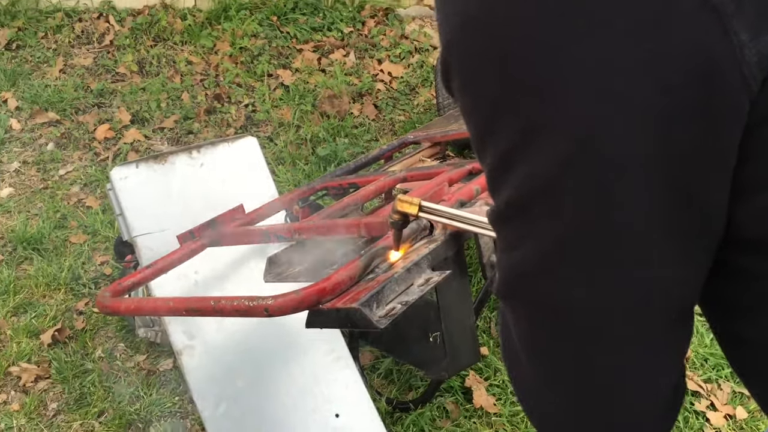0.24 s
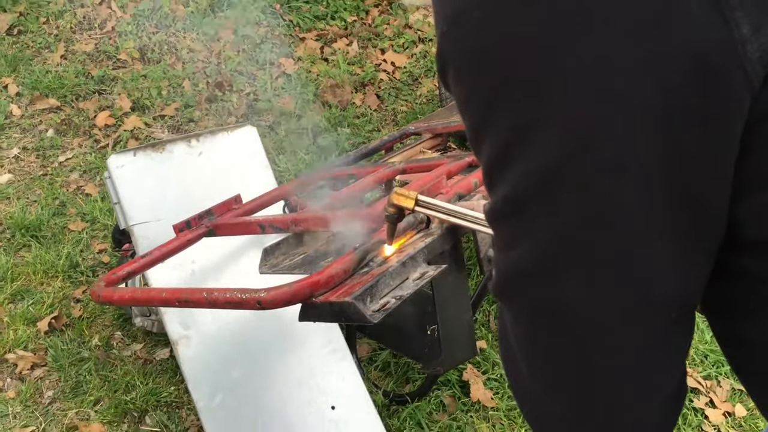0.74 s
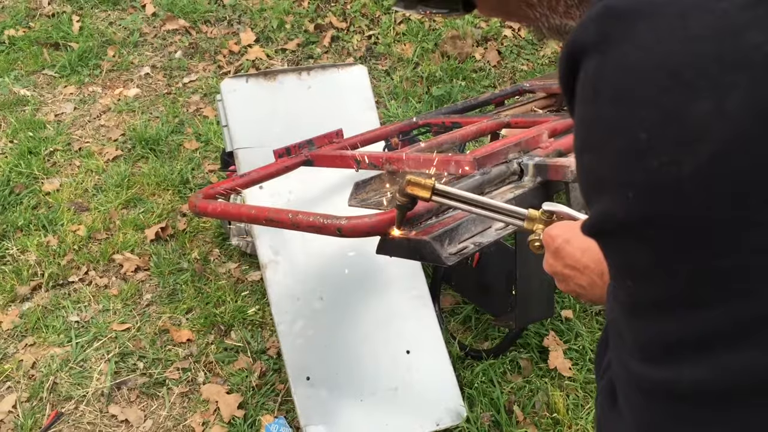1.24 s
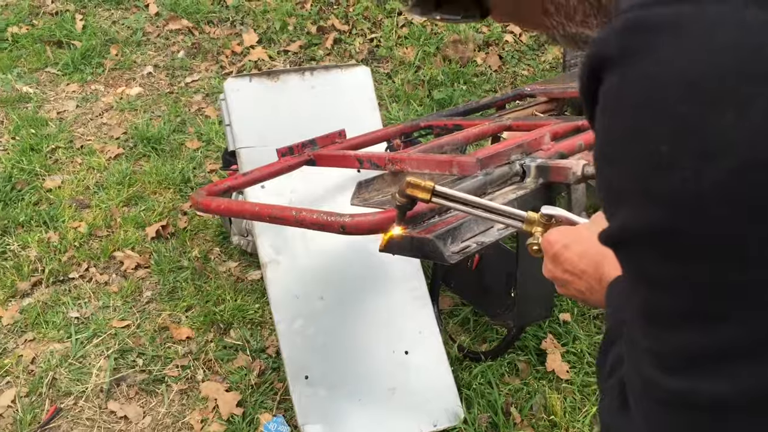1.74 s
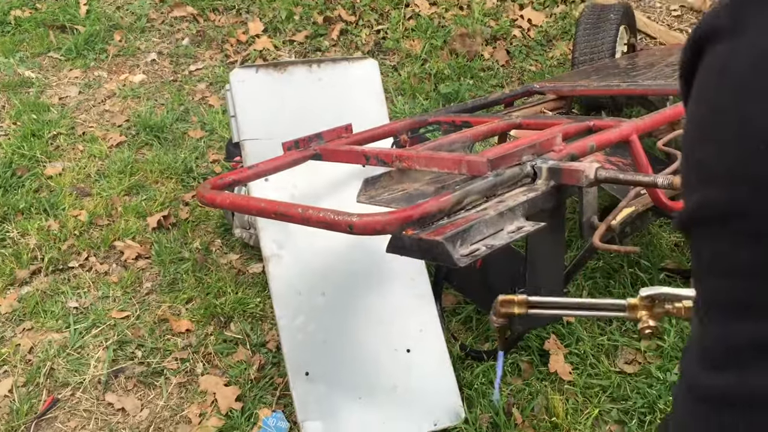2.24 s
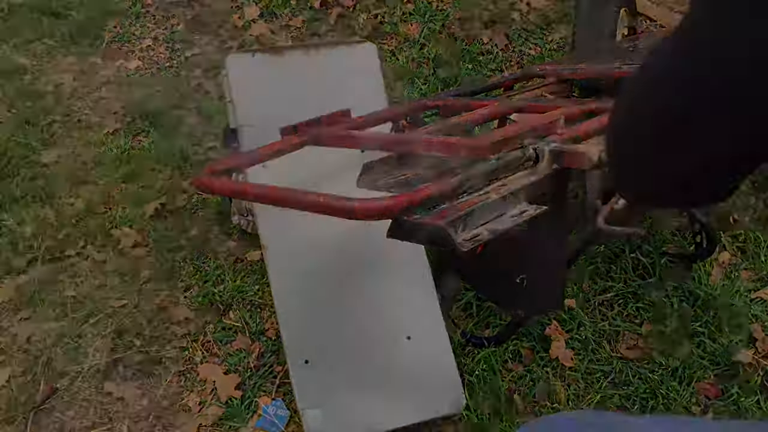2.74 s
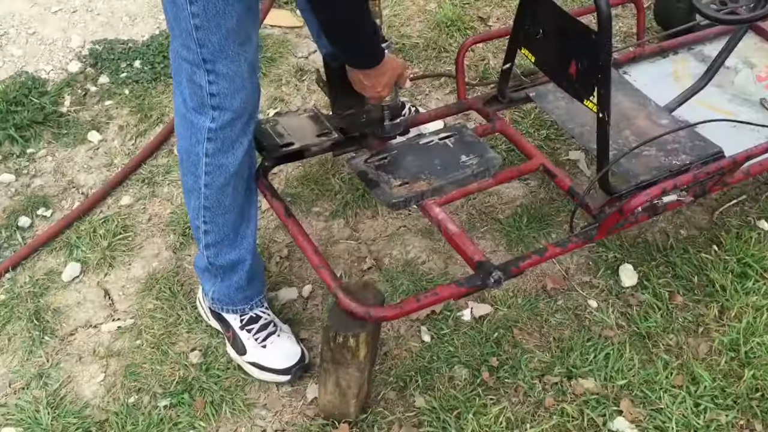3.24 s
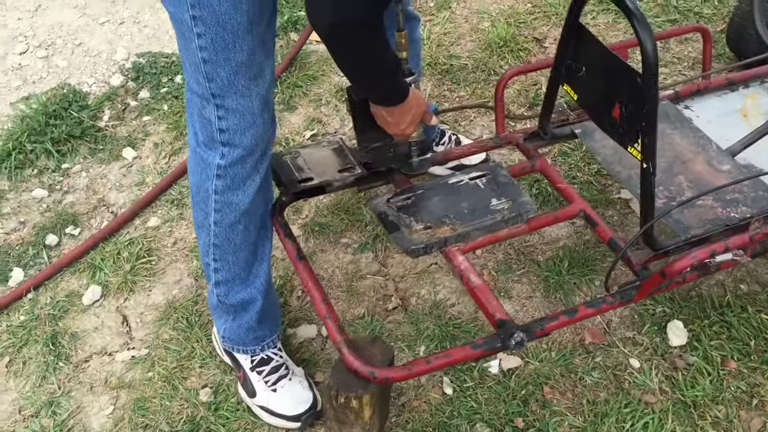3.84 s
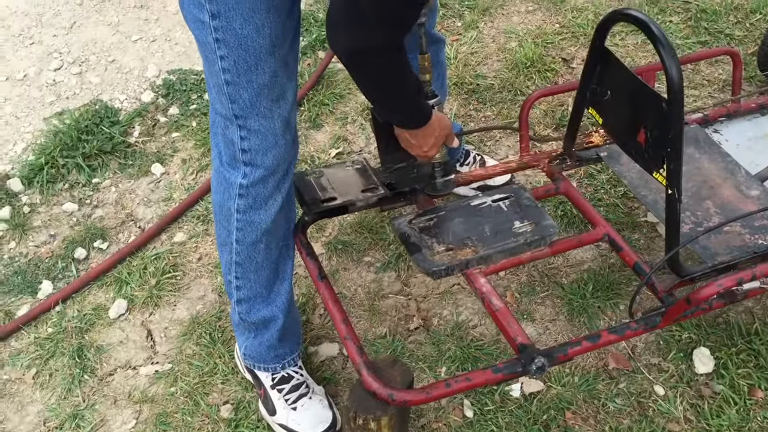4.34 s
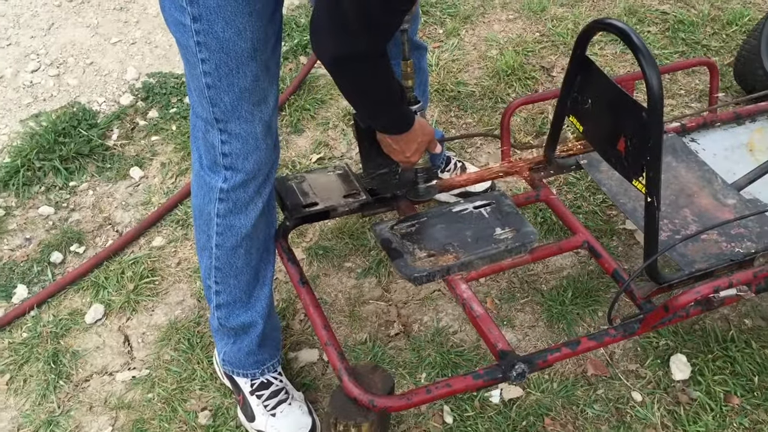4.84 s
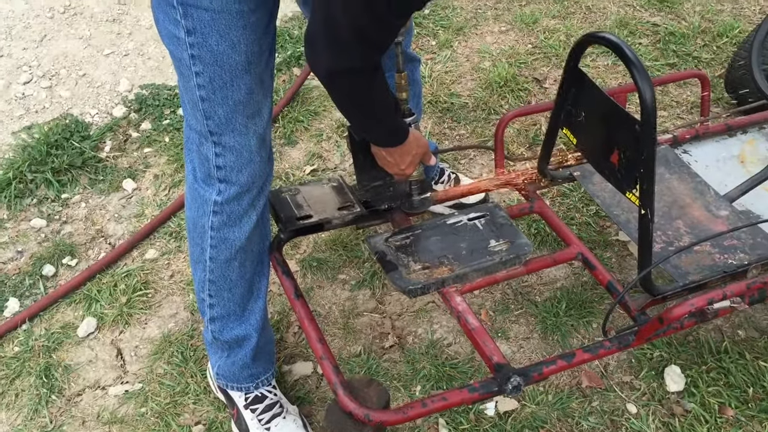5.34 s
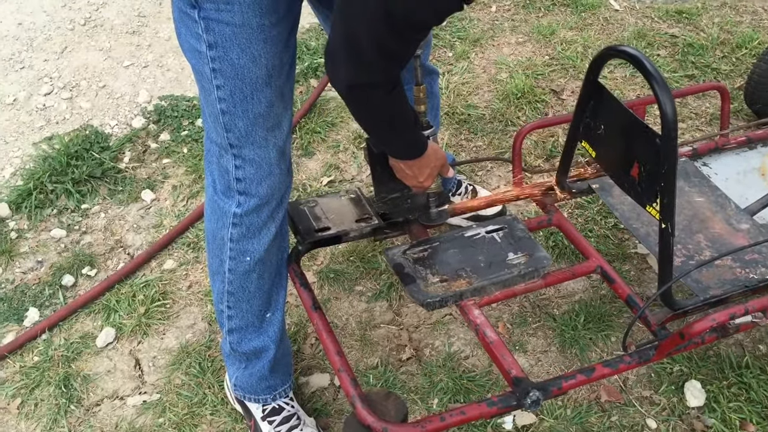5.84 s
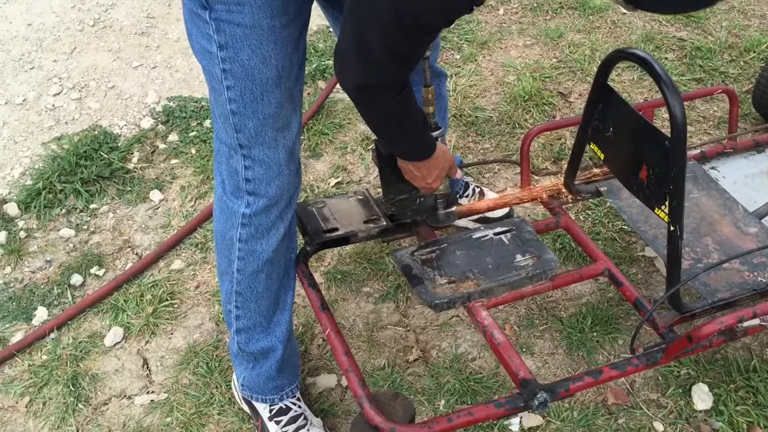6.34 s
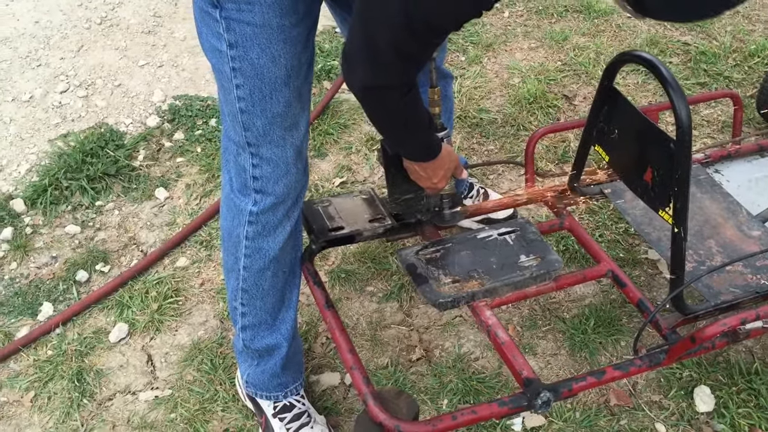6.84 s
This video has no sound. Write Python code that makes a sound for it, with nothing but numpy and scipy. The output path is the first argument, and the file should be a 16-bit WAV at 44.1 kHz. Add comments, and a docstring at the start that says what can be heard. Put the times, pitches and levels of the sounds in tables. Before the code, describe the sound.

Outdoors, close microphone, no speech. From 0 s a cutting torch blows a strong, bright hiss, crackling and spitting, with a hollow ringing colour from the cut. Around 1.1 s it flares and breaks through, becoming fuller and more open. At 2.0 s the jet shuts off abruptly, leaving a soft fluttering flame with thin hiss; it roars up briefly around 2.15 s, then recedes from 2.5 s. A small metallic clink comes at 2.84 s. At 2.94 s an abrupt change: a petrol engine throbs low with clatter over deep wind rumble. At 3.34 s air rushes and a cut-off tool whirs up; rapid knocks on steel tube quicken from 3.5 to 3.9 s. It then grinds loudly, raspy and buzzing, peaking in pitch near 4.1 s, sagging until about 6.9 s, recovering slightly, and continuing to the end. Low wind buffets thump irregularly until about 5.5 s.

```python
"""A hissing, spitting oxygen cutting jet, in gusty wind: filtered turbulence that rings in the kerf until it breaks through.
It is shut off, leaving a soft flame of filtered noise that swings away, and metal clinks as a bank of decaying modes.
Abruptly a second scene: beside a petrol engine (harmonics of the crank rate and throbbing clatter) a cut-off tool spins up.
Its vane whine rises and sags with the rotor speed, over wheel buzz, knocks on the tube and grinding noise.
Wind buffets, short swells of low-pitched noise, run through both scenes."""
import sys
import numpy as np
from scipy import signal
from scipy.fft import rfft, irfft, next_fast_len
from scipy.io import wavfile
from scipy.ndimage import uniform_filter1d

SR = 44100
rng = np.random.default_rng(int(sys.argv[2]) if len(sys.argv) > 2 else 0)


def store_wav(level_fs):
    """Save 16-bit WAV to argv[1]."""
    pcm = np.round(np.clip(np.atleast_2d(level_fs), -1, 1) * 32767)
    wavfile.write(sys.argv[1], SR, pcm.T.astype(np.int16))


N = 313093
TIME = np.arange(N) / SR   # [s]

# cut-off tool
TRIGGER_S = 3.34
SEAT_S = 3.8   # the wheel begins to settle into its groove, still knocking at first
WORKING_TURNS = 240   # turns per s
VANES = 4


def cutting_jet():
    """Turbulent jet noise: cavity resonances colour it in the kerf, until it breaks through; molten slag spits in it."""
    # spectrum of the jet in the kerf: (frequency [Hz], relative level per Hz [dB])
    kerf_jet = [(200, -28), (700, -21), (950, -17.5), (1200, -3.5), (2000, -7), (2800, -5), (4300, -3),
                (4800, -3), (7800, -1.5), (10000, -0.5), (13000, 0), (16000, -3)]
    # air resonances of the kerf: (frequency [Hz], width [Hz], height [dB])
    kerf_resonances = [(1820, 250, 15), (2430, 110, 8.5), (3510, 400, 11), (3970, 280, 10),
                       (5750, 200, 8.5), (6310, 340, 10.5), (7200, 330, 6), (8670, 180, 4), (11600, 200, 1)]
    # spectrum of the jet blowing free: (frequency [Hz], relative level per Hz [dB])
    free_jet = [(200, -26), (600, -18), (1000, -17.5), (1250, -3.5), (1500, -9.5), (1800, -4), (2100, -5),
                (2800, 0.5), (3600, 0.5), (4500, -1), (6500, 2.5), (9500, 2), (13000, 1.5), (16000, -2)]
    # the jet flares or chokes as it meets the metal: (time [s], change [dB], half length [s])
    flares = [(.92, -1.8, 0.045), (1.115, 6.5, 0.05), (1.45, -1, 0.078), (1.69, 2.5, 0.11), (1.9, 1.3, .05)]
    kerf_db, free_db = -28.5, -25
    off_s, fade_s = 1.985, 0.0094

    through = ramp(1.14, 0.08)
    level_db = kerf_db + (free_db - kerf_db) * through + swells(flares)
    level_db = level_db + .5 * drift(25)
    in_kerf = coloured(kerf_jet, kerf_resonances, crackling(per_s=400, spread_db=1.5, grain_db=-9.5))
    free = coloured(free_jet, source=crackling(per_s=600, spread_db=4.5, grain_db=-7.5))
    jet = np.sqrt(1 - through) * in_kerf + np.sqrt(through) * free   # equal-power crossfade
    valve = np.exp(-np.maximum(TIME - off_s, 0) / fade_s)
    return valve * from_db(level_db) * jet


def flame():
    """Combustion noise flutters over thin nozzle hiss; a delayed ground echo combs both, sliding as the torch swings away."""
    # rush of the preheat flame: (frequency [Hz], relative level per Hz [dB])
    flame_rush = [(300, -22), (800, -2), (1300, 4), (2300, -0.5), (3200, -2.5), (4500, -11.5),
                  (8000, -20.5), (16000, -48)]
    # hiss of its nozzles: (frequency [Hz], relative level per Hz [dB])
    nozzle = [(2000, -21), (5000, -2), (6300, 9.5), (7700, 1), (9300, -24), (11000, -6), (13000, -1),
              (14600, 6), (16000, -1)]
    rush_near_db, rush_far_db = -44.5, -56.5
    hiss_near_db, hiss_far_db = -50.5, -55

    away = ramp(2.475, 0.18)
    swing_db = 5 * ramp(2.15, 0.037)   # swung through the air, the flame roars up
    rush_db = (rush_near_db + swing_db) * (1 - away) + rush_far_db * away
    hiss_db = hiss_near_db * (1 - away) + hiss_far_db * away
    rush = from_db(rush_db + 1.8 * drift(25)) * coloured(flame_rush)
    hiss = from_db(hiss_db) * coloured(nozzle)
    direct = ramp(1.9, 0.083) * (rush + hiss)
    echo_s = .001 + .0015 * ramp(2, .8)
    echo = .45 * np.interp(TIME - echo_s, TIME, direct)
    return direct + echo


def clink(ring_db, crack_db):
    """Modal excitation: a short scraping contact sets steel ringing."""
    # metal on metal: (time [s], relative level [dB])
    contacts = [(2.8398, -22)]
    # modes of the steel: (frequency [Hz], relative level [dB], 60 dB decay time [s])
    clink_modes = [(2324, -5, 0.28), (2420, -12, .15), (4270, -7, 0.15), (4440, 0, .13), (5750, 8, 0.091),
                   (6675, 1, 0.082), (7500, -2, .08), (8920, 3, .08), (10100, -8, .07), (11810, -8, .08)]
    force = scrapes(contacts, contact_s=.013)
    return from_db(ring_db) * ring(force, clink_modes) + from_db(crack_db) * force


def cut_off_tool():
    """Sound locked to rotation: rotor whine, wheel buzz, and grit tearing at the steel in step with the turning wheel."""
    # spectrum of the grinding noise: (frequency [Hz], relative level per Hz [dB])
    grind = [(300, -8.5), (700, -16), (1500, -5.5), (2700, 1), (3400, 2), (4400, -5), (5200, 3),
             (5850, 5.5), (6800, 1), (7700, -2.5), (9000, 4), (10500, -2), (13500, -5.5), (16000, -7)]
    # the wheel bites harder or eases off: (time [s], change [dB], half length [s])
    bites = [(3.98, 3, .11), (4.46, 2, 0.067), (4.88, 2, 0.099), (6.0, 1, .04), (6.09, -1.8, .05),
             (6.55, 0.5, 0.37), (7.05, 3, 0.13)]
    turns = rotor_speed()
    seated = ramp(SEAT_S, 0.15)
    # louder with speed, 6 dB per octave; the wheel grinds less until it has settled
    grind_db = -16.5 + 6 * np.log2(turns / WORKING_TURNS) - 4 * (1 - seated) + swells(bites)
    # buzz relative to grinding noise; it grows 1 dB per s as the groove deepens
    unseated_db, seated_db = -15, -1.5 + 1 * (TIME - SEAT_S)
    buzz_db = unseated_db * (1 - seated) + seated_db * seated
    # the wheel chatters in the cut, which blurs the high harmonics
    chatter = .0009 * drift(54.2)   # as a share of the speed
    angle = 2 * np.pi * np.cumsum(turns * (1 + chatter)) / SR
    buzz = wheel_buzz(angle, turns, vane_db=1.5)
    grit = crackling(per_s=1900, spread_db=6.5, grain_db=-6) * (1 + 0.17 * np.cos(angle))
    grinding = coloured(grind, source=grit) + from_db(buzz_db) * buzz
    grinding = grinding / np.sqrt(1 + from_db(2 * buzz_db))   # the mix keeps its power
    work = from_db(grind_db + 0.77 * drift(15)) * grinding
    return ramp(TRIGGER_S + 0.017, 0.073) * (vane_whine(angle, turns) + work)


def rotor_speed():
    """Rotational inertia: the speed, in turns per second, rounds every change."""
    # (time [s], speed before rounding [turns per s])
    speed = [(3.33, 70), (3.4, 118), (3.48, 164), (3.84, 139.4), (4.04, 264), (4.14, 273), (4.39, 241),
             (4.56, 238.6), (5.16, 242), (5.3, 239.5), (5.62, 231), (5.95, 234), (6.09, 234), (6.42, 226),
             (6.54, 219.5), (6.67, 206), (6.85, 194), (6.96, 202), (7.1, 210)]
    inertia_s = .05
    return uniform_filter1d(in_time(speed)[0], size=int(inertia_s * SR))


def vane_whine(angle, turns, count=3):
    """Vane-passing tones swell as they cross the resonances of the rotor chamber; a slow rotor sounds duller."""
    # smooth response of the rotor chamber: (frequency [Hz], level [dB])
    chamber = [(400, -28), (900, -29), (1300, -30.5), (3400, -33.5)]
    # its resonances: (frequency [Hz], width [Hz], height [dB])
    chamber_peaks = [(551, 63, 7.5), (826, 190, 10.5), (1038, 170, 8), (2094, 330, 7.5), (2655, 210, 8.5),
                     (2890, 250, 6), (3200, 240, 12.5)]
    # below 212 turns per s each further harmonic loses 10.5 dB per octave of speed
    dull_db = 10.5 * np.minimum(np.log2(turns / 212), 0)
    out = np.zeros(N)
    for overtone in range(count):
        k = VANES * (overtone + 1)
        level_db = response_db(chamber, chamber_peaks, k * turns) + overtone * dull_db + 0.62 * drift(18)
        out += np.sqrt(2) * from_db(level_db) * np.sin(k * angle)
    return out


def wheel_buzz(angle, turns, vane_db, count=80):
    """Harmonics of the turning rate under a fixed spectral envelope, brighter with speed; those of the vanes stand out."""
    # smooth response of the housing: (frequency [Hz], relative level [dB])
    housing = [(300, -24), (650, -18), (1000, -7), (1500, -11), (2000, -3), (2800, 0), (3400, -4),
               (4100, -1), (5000, 0), (6500, 1), (8000, -2), (9200, 2), (10200, -5), (13000, -4),
               (16000, -11)]
    # broad peaks on it, where harmonics of the vanes sound strong at working speed:
    # (frequency [Hz], width [Hz], height [dB])
    broad_peaks = [(1300, 150, 9), (2170, 160, 3), (2680, 140, 4), (3700, 180, 5), (4950, 350, 5),
                   (5750, 200, 7), (6760, 250, 7), (7580, 120, 7), (8650, 250, 4), (10700, 300, 4),
                   (12400, 250, 3)]
    # the buzz tilts about the pivot, by so many dB per octave for each doubling of speed
    pivot_hz, brightening_db = 5500, 11
    stress_db_per_octave = 26   # vane harmonics stand out more above the working speed

    out, hz = np.zeros(N), np.arange(SR)
    envelope_db = response_db(housing, broad_peaks, hz)
    slowest = turns[TIME > SEAT_S].min()
    octaves = np.log2(np.maximum(turns, slowest) / WORKING_TURNS)
    stress_db = vane_db + stress_db_per_octave * np.maximum(octaves, 0)
    for k in range(2, count):
        on_vane = k % VANES == 0
        if on_vane and k <= 3 * VANES:
            continue   # these belong to the vane whine
        waver = np.exp(.3 * drift(1.2))
        tilt_db = brightening_db * octaves * (octaves + np.log2(k * WORKING_TURNS / pivot_hz))
        level_db = envelope_db[(k * turns).astype(int)] + tilt_db + stress_db * on_vane
        out += from_db(level_db) * waver * np.sin(k * angle + rng.uniform(0, 2 * np.pi))
    return out / np.std(out[TIME > SEAT_S])


def knocks(ring_db, crack_db):
    """Impacts locked to rotation ring the tube: every third turn, then every second, then every turn."""
    # bouncing of the wheel: (start [s], end [s], hop [turns], relative level [dB])
    bounces = [(3.483, 3.565, 3, -6.5), (3.571, 3.605, 2, -6), (3.619, 3.739, 2, -4.5),
               (3.778, 3.942, 1, -6.5)]
    # tube modes: (frequency [Hz], relative level [dB], 60 dB decay time [s])
    tube = [(2740, -15, 0.036), (3615, -9, 0.056), (3740, -6.5, 0.057), (4150, -7.5, .04), (5300, -18, .03),
            (6000, -1.5, 0.016), (7220, 0.5, 0.015), (7510, -1, 0.013), (8550, 1.5, 0.01),
            (9700, -3, 0.0091), (10950, -3, 0.013)]
    turned = np.cumsum(rotor_speed()) / SR
    hits = []
    for start, end, hop, level_db in bounces:
        first, last = np.interp([start, end], TIME, turned)
        marks = np.arange(first, last, max(round(hop), 1))
        for s in np.interp(marks, turned, TIME):
            hits.append((s, level_db + 1.0 * rng.standard_normal()))   # 1 dB spread
    force = scrapes(hits, contact_s=0.0025)
    return from_db(ring_db) * ring(force, tube) + from_db(crack_db) * force


def start_rush(level_db, swell_s):
    """Flow noise: as the trigger opens, air rushes through the still slow rotor, swells and dies."""
    # (frequency [Hz], relative level per Hz [dB])
    rush_colour = [(200, -14), (500, 3), (1000, 1.5), (1700, -2), (2300, -8), (4000, -6.5), (8000, -10),
                   (16000, -20)]
    age = np.maximum(TIME - TRIGGER_S, 0) / swell_s
    swell = age * np.exp(1 - age)
    rush = coloured(rush_colour, source=crackling(per_s=250, spread_db=1, grain_db=-9))
    return from_db(level_db) * swell * rush


def engine():
    """A four-stroke fires every second turn, so exhaust lines fall on half orders; clatter throbs with the crank."""
    # (time [s], crank speed [turns per s], exhaust level [dB])
    crank = [(2.95, 64, -21.5), (3.15, 62, -21), (3.5, 61.2, -20), (3.8, 63, -24.5), (5, 59.5, -26),
             (6, 61, -22), (6.6, 61.6, -22.5), (7.1, 61, -25.5)]
    # exhaust lines: (multiple of crank rate, relative level [dB])
    orders = [(1, -26), (1.5, -22), (2, 1.5), (2.5, -13), (3, -11.5), (3.5, -16.5), (4, -15.5), (4.5, -34),
              (5.5, -26.5)]
    # engine clatter and rumble: (frequency [Hz], relative level per Hz [dB])
    clatter_colour = [(15, -46), (25, -16), (91, -13), (122, -4.5), (152, -10), (458, -28), (1540, -22.5),
                      (1710, -24), (1960, -25), (4280, -30), (6410, -26), (15600, -38.5)]
    # ringing covers: (frequency [Hz], width [Hz], height [dB])
    cover_peaks = [(790, 59, 7), (930, 100, 2.5), (1760, 60, 8), (6370, 600, 5), (9700, 830, 7)]
    turns, level_db = in_time(crank)
    angle = 2 * np.pi * np.cumsum(turns * (1 + 0.0036 * drift(4.4))) / SR
    exhaust = np.zeros(N)
    for order, db in orders:
        half_order = round(2 * order) / 2
        phase = rng.uniform(0, 2 * np.pi)
        exhaust += from_db(db + 1.8 * drift(4.1)) * np.sin(half_order * angle + phase)
    clatter = reflected(coloured(clatter_colour, cover_peaks)) * (1 + 0.21 * np.cos(angle))
    return from_db(level_db) * exhaust + from_db(-25.5) * clatter


def buffets(level_db, lag_s, core_db, core_s):
    """Eddy pressure on the microphone port: each eddy swells and dies; the stronger it is, the harsher its middle."""
    # (time [s], relative peak level [dB])
    eddies = [(.01, -22), (0.046, -16.5), (.264, -28.5), (0.739, -20), (.925, -23.5), (1.125, -21),
              (1.196, -21.5), (1.303, -15), (1.749, -20.5), (1.91, -25), (2.007, -21.5), (2.101, -18),
              (2.2, -22), (2.248, -15.5), (2.27, -18), (2.459, -19), (2.488, -18.5), (2.543, -22),
              (2.572, -9), (2.694, -25), (2.785, -17.5), (2.799, -18), (2.852, -14.5), (2.867, -15),
              (3.39, -16.5), (3.533, -9), (3.577, -12), (4.117, -15), (4.462, -15), (4.655, -9),
              (5.072, -12), (5.119, -12), (5.16, -14.5), (5.542, -17)]
    # spectrum of a buffet: (frequency [Hz], relative level per Hz [dB])
    buffet_colour = [(30, -46), (70, -9), (130, 5), (220, 1), (350, -5), (600, -21), (1000, -26.5),
                     (2000, -56), (5000, -75)]
    # spectrum of its fast middle: (frequency [Hz], relative level per Hz [dB])
    eddy_core = [(150, -20), (300, -4), (480, 9.5), (700, -7.5), (1200, -12.5), (2500, -26), (6000, -59)]
    swell_s = 0.0097   # time in which an eddy swells, and dies
    air, fast_air, out = coloured(buffet_colour), coloured(eddy_core), np.zeros(N)
    for s, peak_db in eddies:
        near = slice(max(int((s - .1) * SR), 0), int((s + .15) * SR))
        away = np.abs(TIME[near] - s - lag_s)
        lump = air[near] * np.exp(-away / swell_s)
        core = fast_air[near] * np.exp(-away / core_s)
        out[near] += from_db(peak_db + level_db) * lump / np.abs(lump).max()
        out[near] += from_db(1.58 * peak_db + core_db) * core / np.abs(core).max()
    return out


def rumble():
    """Low-frequency turbulence: deep gusting wind on the microphone."""
    # (time [s], mean level [dB])
    rumble_level = [(2.96, -25.5), (3.5, -23), (3.9, -22), (4.35, -21.5), (4.75, -25), (5.2, -25.5),
                    (7.1, -26.5)]
    # (frequency [Hz], relative level per Hz [dB])
    rumble_colour = [(20, -20), (35, -19), (55, 2), (90, 0.5), (150, -11), (300, -18.5), (800, -27)]
    return from_db(in_time(rumble_level)[0] + 2.2 * drift(14)) * coloured(rumble_colour)


def breeze():
    """Randomly modulated turbulence: light lumpy wind between the buffets."""
    # the wind freshens: (time [s], mean level [dB])
    breeze_level = [(0, -49.5), (.45, -52), (.85, -47), (1.35, -37.5), (1.7, -43.5), (2.1, -35.5),
                    (2.9, -45)]
    # (frequency [Hz], relative level per Hz [dB])
    breeze_colour = [(25, -40), (60, -19), (120, 4), (200, 0), (350, -10), (700, -19), (2000, -40)]
    return from_db(in_time(breeze_level)[0] + 4.6 * drift(42)) * coloured(breeze_colour)


def reflected(x):
    """Comb filtering: short echoes off near surfaces ripple the spectrum."""
    # reflections off the plate and frame: (delay [s], gain)
    reflections = [(.0018, .2), (.00313, .2), (.0053, -.18), (.0077, .14)]
    return x + sum(gain * np.interp(TIME - delay, TIME, x, left=0) for delay, gain in reflections)


def ring(drive, modes):
    """Modal synthesis: each mode of a steel part is a damped resonator; a unit click sets it ringing at its level."""
    out = np.zeros(N)
    for hz, db, t60 in modes:
        r, w = from_db(-60 / (t60 * SR)), 2 * np.pi * hz / SR
        resonator = [1, -2 * r * np.cos(w), r * r]
        out += from_db(db) * signal.lfilter([0, np.sin(w)], resonator, drive + 1e-18)
    return out


def scrapes(events, contact_s):
    """Contact force: each event is a short rough burst of given energy, dying exponentially."""
    out, age = np.zeros(N), TIME[:SR // 8]
    for s, level_db in events:
        burst = rng.standard_normal(len(age)) * np.exp(-age / contact_s)
        start = int(s * SR)
        out[start:start + len(age)] += from_db(level_db) * burst / np.linalg.norm(burst)
    return out


def crackling(per_s, spread_db, grain_db):
    """Shot noise: white turbulence with tiny bursts of uneven size at random times."""
    sizes = from_db(spread_db * np.minimum(rng.exponential(1, N), 4))
    clicks = sizes * (rng.random(N) < per_s / SR)
    decay = np.exp(-1 / (0.00029 * SR))   # 0.29 ms
    bursts = signal.lfilter([1], [1, -decay], clicks + 1e-18)
    return rng.standard_normal(N) + from_db(grain_db) * rms_one(bursts * rng.standard_normal(N))


def coloured(spectrum, resonances=(), source=None):
    """Source-filter principle: turbulence (or another source) shaped by a spectrum and its resonances; rms 1."""
    size = next_fast_len(N)
    hz = np.arange(size // 2 + 1) * SR / size
    gain = from_db(response_db(spectrum, resonances, hz)) * (hz > 30)
    source = rng.standard_normal(N) if source is None else source
    return rms_one(irfft(rfft(source, size) * gain, size)[:N])


def response_db(spectrum, peaks, hz):
    """Spectral envelope: bell-shaped peaks stand on a smooth spectrum, in dB."""
    bells = sum(db / (1 + (2 * (hz - centre) / width) ** 2) for centre, width, db in peaks)
    return at_hz(spectrum, hz) + bells


def at_hz(points, hz):
    """Interpolation on a log-frequency axis: read a spectrum."""
    f, db = np.transpose(points)
    return np.interp(np.log(hz + 1e-3), np.log(f), db)


def drift(rate):
    """Low-passed noise: slow chance of spread 1, computed at every 40th sample and interpolated."""
    r = np.exp(-80 * np.pi * rate / SR)
    noise = rng.standard_normal(N // 40 + 2002)
    slow = signal.lfilter([1], [1, -2 * r, r * r], noise)[2000:]   # past the filter's onset
    return np.interp(np.arange(N) / 40, np.arange(len(slow)), rms_one(slow))


def swells(rows):
    """Amplitude envelope: bell-shaped changes of level, in dB."""
    return sum(db * np.exp(-((TIME - s) / length) ** 2) for s, db, length in rows)


def ramp(start, length):
    """Linear envelope: 0 before start, 1 a length later."""
    return np.clip((TIME - start) / length, 0, 1)


def in_time(rows):
    """Linear interpolation: each column of a curve at every sample."""
    s, *columns = np.transpose(rows)
    return [np.interp(TIME, s, c) for c in columns]


def from_db(db):
    """Logarithmic level: decibels to gain."""
    return 10 ** (np.asarray(db) / 20)


def rms_one(x):
    """Normalisation: scale to rms 1."""
    return x / np.sqrt(np.mean(x ** 2) + 1e-20)


def scene():
    """Superposition: torch first, then an abrupt change to the cut-off tool; both channels alike."""
    change_s = 2.935
    torch = reflected(cutting_jet()) + flame() + breeze() + clink(ring_db=-17.5, crack_db=14.5)
    tool = start_rush(level_db=-19.5, swell_s=0.029) + cut_off_tool() + knocks(ring_db=-11, crack_db=5.0)
    yard = engine() + rumble() + tool
    wind = buffets(level_db=-1.0, lag_s=0.0056, core_db=2.5, core_s=0.0056)
    fade_out, fade_in = 1 - ramp(change_s - .02, 0.023), ramp(change_s, .025)
    mono = torch * fade_out + yard * fade_in + wind
    return np.stack([mono, mono])


def record(dry):
    """Saturation and band limiting: peaks are rounded, the top is cut above 15750 Hz."""
    top_cut = signal.ellip(12, .1, 80, 15750, fs=SR, output="sos")
    return signal.sosfilt(top_cut, 1.095 * np.tanh(dry / 1.102))


dry = scene()
out = record(dry)
store_wav(out)
```